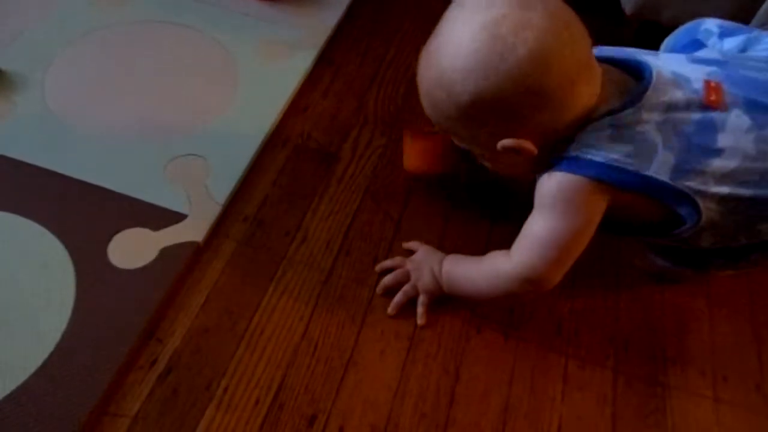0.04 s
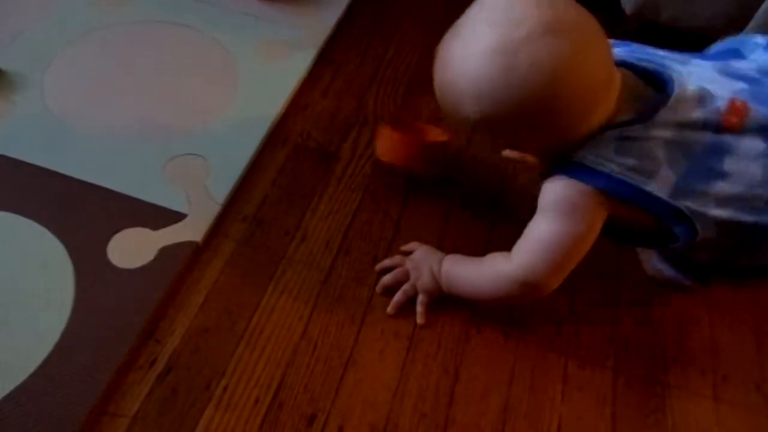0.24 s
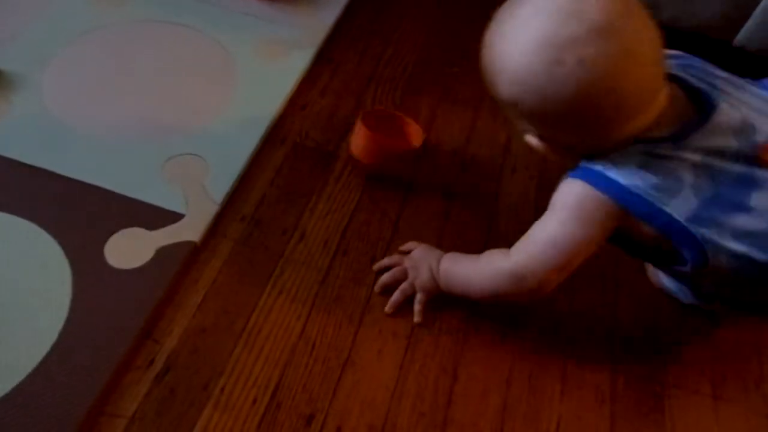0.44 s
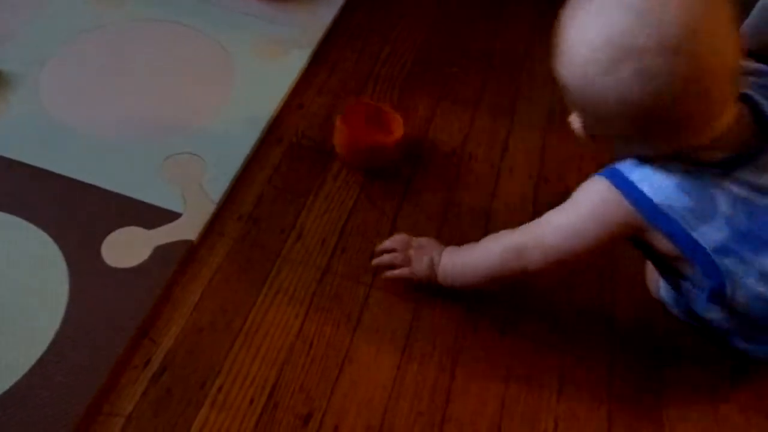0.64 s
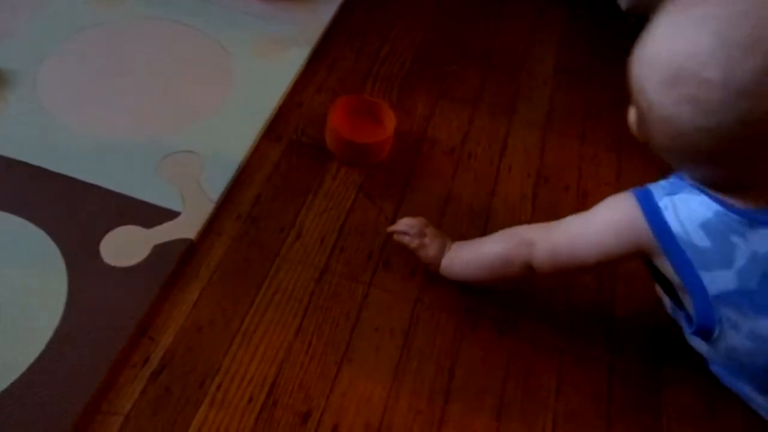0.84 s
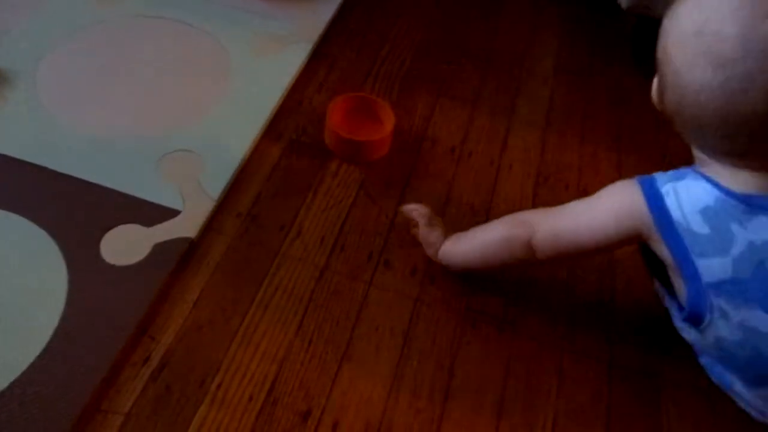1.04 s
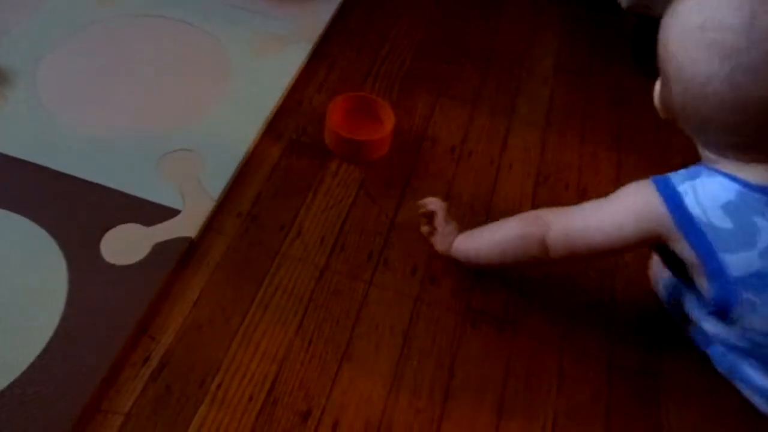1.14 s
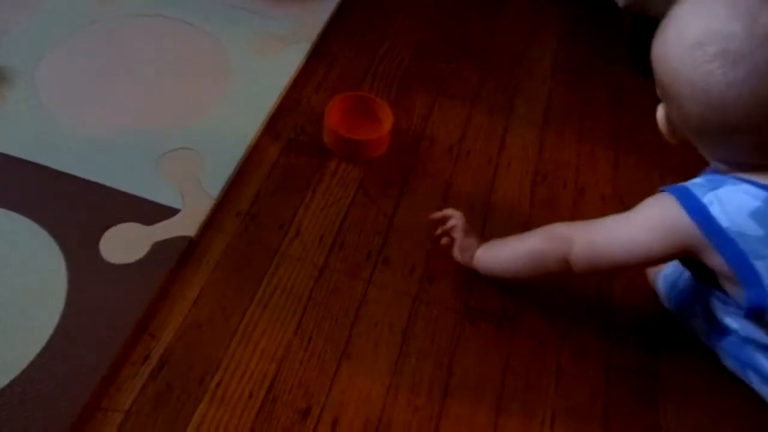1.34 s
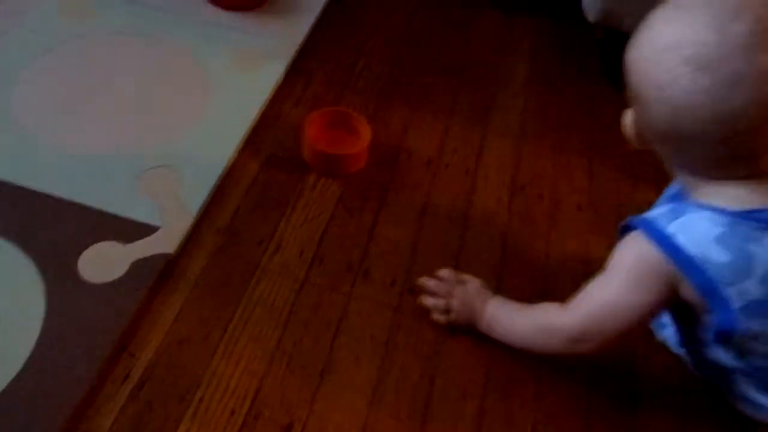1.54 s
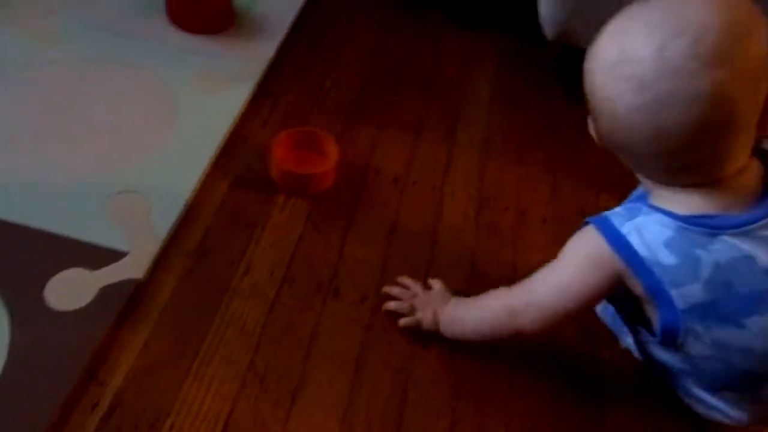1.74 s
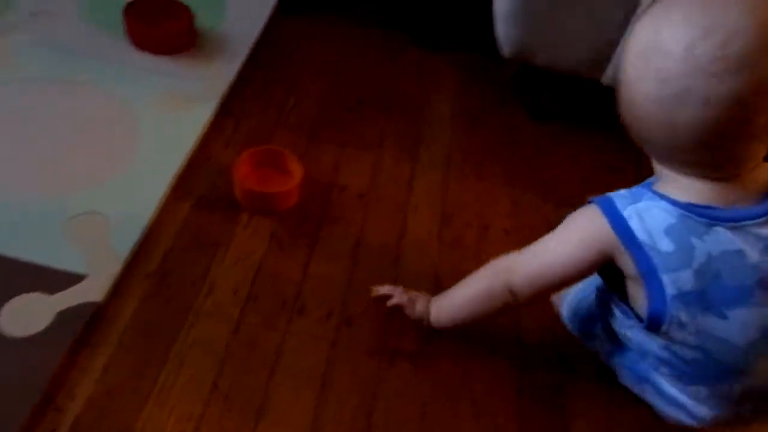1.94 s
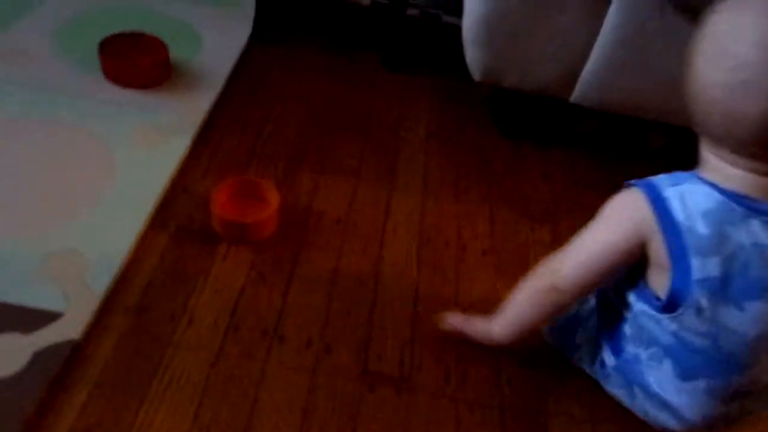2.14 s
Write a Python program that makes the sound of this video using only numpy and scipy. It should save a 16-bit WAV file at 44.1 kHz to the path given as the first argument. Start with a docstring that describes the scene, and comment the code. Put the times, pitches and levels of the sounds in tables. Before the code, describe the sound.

Quickening clacks of a plastic cup wobbling to rest on floorboards, then soft thumps.

```python
"""Fingers rub faintly on hard plastic; then the cup tips out of a baby's hand and rocks on a wooden
floor, ever faster, until it settles. Each touch of the rim cracks, rings the cup wall and knocks the
boards, and a small quiet room answers. A hand then thumps softly on the floor.
Two closely spaced microphones hear it from above, with the cup a little to the right."""
import sys
import numpy as np
from scipy import signal
from scipy.fft import rfft, irfft
from scipy.io import wavfile

SR = 44100
rng = np.random.default_rng(int(sys.argv[2]) if len(sys.argv) > 2 else 0)


def output_pcm(signal):
    """Save a mono or channel-first signal as 16-bit PCM at the path in sys.argv[1].

    Samples are clipped to [-1, 1] before scaling.
    """
    pcm = np.clip(np.atleast_2d(signal).T, -1, 1) * 32767
    wavfile.write(sys.argv[1], SR, np.round(pcm).astype(np.int16))


N = 97020
T = np.arange(N) / SR
CONTACT_T = T[:N // 12]
FREQS = np.arange(N + 1) * SR / (2 * N)

# The rim landing on the floor below the microphones: (time [s], gain [dB], knock gain [dB],
# knock centre [Hz], crack gain [dB], contact cut-off [Hz], ring centre [Hz])
RIM_CONTACTS = [ (.2260, -21, 12, 264, -22, 3000, 2000), (.2341, -6.5, 3.5, 179, 1.5, 4980, 2000),
                (.3980, -22.5, 2, 400, 3, 4200, 2400), (.4015, -27.5, 8, 400, 9, 9000, 2400),
                (.4050, -1, 0.5, 300, 1, 9000, 2190), (.5358, -24.5, 13, 400, 8, 5000, 2000),
                (.5399, -2, -2, 324, -4.5, 4420, 2240), (.6545, -2, -2, 380, -3, 6500, 2780),
                (.6575, -16.5, 1, 457, 7.5, 5500, 2400), (0.7494, -12.5, 2, 500, -6, 9700, 2800),
                (.7520, -16, 5.5, 586, 9.5, 18300, 2700), (.8330, -14, 4.5, 550, -0.5, 5000, 2800),
                (.8362, -26, 12.5, 550, 1, 11900, 1400), (.8404, -20.5, 8.5, 400, 4, 7000, 1800),
                (.8480, -9.5, -3, 447, 0.5, 6500, 3000), (.9047, -11.5, 2, 500, -2, 6300, 2900),
                (.9074, -32, 6, 450, -5, 11000, 1640), (.9195, -13, 1.5, 353, -5.5, 7760, 1680),
                (.9298, -33, -17, 400, 8, 5000, 2400), (.9634, -15.5, 6.5, 560, 1.5, 8450, 3000),
                (.9778, -15, 1, 330, 1.5, 6200, 3260), (.9968, -22, 9.5, 297, -2, 3460, 2400),
                (1.0063, -21.5, 10, 500, 2.5, 11000, 1200)]

def rocking_cup():
    """Each landing shakes cup and floor; gives the direct sound and (time, sound) pairs for the room."""
    direct, into_room = np.zeros(N), []
    for start, db, knock_db, knock_hz, crack_db, cutoff_hz, ring_hz in RIM_CONTACTS:
        softness = signal.butter(1, cutoff_hz, fs=SR)
        strike = lambda x: amp(db) * signal.lfilter(*softness, x)
        click, crack = map(strike, rim_crack(crack_db))
        wall = strike(wall_ring(start, ring_hz))
        boards = strike(board_knock(knock_db, knock_hz))
        plastic = wall + crack
        echo_lag_s = 0.0029 * (1 + 0.039 * rng.standard_normal())  # first strong reflection
        echo = np.interp(CONTACT_T - echo_lag_s, CONTACT_T, plastic, left=0)
        add(direct, start, plastic + amp(-10) * echo - boards)
        into_room += [(start, amp(3) * click), (start, amp(3) * wall - amp(-3.5) * boards)]
    return direct, into_room


# Spectrum of plastic meeting wood: (frequency [Hz], relative level [dB])
CRACK_SPECTRUM = [(100, -22), (400, -16), (1000, -0.5), (2000, 7.5), (3200, 3), (3900, -3), (5200, -4),
                  (6400, -13), (8000, -10.5), (10000, -13.5), (13000, -11.5), (16000, -5)]

def rim_crack(db, grain_decay_s=0.0015):
    """The hard rim clicks on the wood; gives the clean click and the same click made grainy."""
    click = amp(db + 10.5) * irfft(minimum_phase(curve(CRACK_SPECTRUM)))[:len(CONTACT_T)]
    grain = 0.17 * rng.standard_normal(len(click)) * np.exp(-CONTACT_T / grain_decay_s)
    grain[0] = 1
    return click, signal.fftconvolve(grain, click)[:len(click)]


# Modes of the cup wall: (frequency [Hz], relative level [dB], t60 [s])
WALL_MODES = [(1080, -25, .04), (1220, -21, 0.022), (1698, -8.5, 0.15), (1853, -6, 0.1),
              (2104, -2.5, 0.034), (2270, -0.5, 0.029), (2524, -4.5, 0.03), (2700, -5.5, .04),
              (2904, 3.5, 0.027), (3122, -7, 0.088), (3280, -14, 0.11), (4688, 6, 0.019),
              (5070, -24, 0.015), (7640, -17, .015)]
# Low wall modes, freer as the cup comes upright: (nominal frequency [Hz], relative level [dB], t60 [s])
FREED_MODES = [(1317, -5, 0.094), (1397, -6, 0.099)]

def wall_ring(start, centre_hz, upright_s=0.85, rise_db_per_s=36):
    """The struck wall rings, its pitches shifted a little by each contact."""
    shift = 1 + 0.016 * rng.standard_normal((len(WALL_MODES), 1))
    wall = ring(WALL_MODES, CONTACT_T, centre_hz, focus_db_per_oct=13.5, tuning=shift)
    freed = ring(FREED_MODES, CONTACT_T, centre_hz, focus_db_per_oct=0, tuning=0.98)
    freedom = amp(-rise_db_per_s * max(upright_s - start, 0))
    return amp(-16.5) * (wall + freedom * freed)


# Floorboards under the cup: (frequency [Hz], relative level [dB], t60 [s])
FLOOR_MODES = [(167.7, -49, 0.061), (234.4, 0.5, 0.075), (251, -6.5, 0.058), (343, -8, 0.098),
               (380, -7, 0.054), (498, -7, 0.073), (563, 8.5, 0.027), (717.3, 1, 0.085), (885, -4, 0.07)]

def board_knock(db, centre_hz, lag_s=0.002258, cut_hz=166):
    """The boards answer just after the rim; pitches differ from spot to spot and little bass radiates."""
    spot = 1 + 0.015 * rng.standard_normal((len(FLOOR_MODES), 1))
    t = np.maximum(CONTACT_T - lag_s, 0)
    knock = ring(FLOOR_MODES, t, centre_hz, focus_db_per_oct=6.5, tuning=spot)
    low_cut = signal.butter(3, cut_hz, "high", fs=SR, output="sos")
    return amp(db - 20.5) * signal.sosfilt(low_cut, knock)


# The rim scraping along the floor: (end time [s], peak level [dB])
RIM_DRAGS = [(.234, -27), (0.407, -14), (.540, -24.5), (0.6565, -20), (0.751, -23)]

def rim_drags(rise_s=0.0046):
    """The rim drags on the wood, swelling into each of the first landings."""
    scrape = noise(band(920, width_hz=1850) ** 2)
    return scrape * sum(amp(db) * (T < end) * np.exp(-abs(T - end) / rise_s) for end, db in RIM_DRAGS)


# Hand and body on the floor, centred between the microphones:
# (time [s], peak level [dB], frequency [Hz], half rise time [s])
FLOOR_THUMPS = [(1.112, -39.5, 75, 0.0058), (1.171, -22, 149, 0.0048), (1.201, -30, 52.4, 0.0059),
                (1.204, -36, 150, 0.0036), (1.243, -40.5, 159, 0.0064), (1.287, -33.5, 53.3, 0.0038),
                (1.362, -61, 60, 0.0072), (1.426, -53, 60, 0.0086), (1.508, -59, 57, 0.0065)]

def hand_thumps():
    """Soft weight on the boards: a few low cycles that swell and die."""
    out = np.zeros(N)
    for start, db, hz, half_rise_s in FLOOR_THUMPS:
        rise = T / (2 * half_rise_s)
        envelope = rise * np.exp((1 - rise ** 2) / 2)
        add(out, start, amp(db) * envelope * np.sin(2 * np.pi * hz * T))
    return out


# Resonances of the rubbed wall: (frequency [Hz], width [Hz], relative level [dB])
RUB_RESONANCES = [(3000, 470, 5), (4400, 460, 7), (7400, 4100, -9.5)]
# Fingers on the cup before it tips: (peak time [s], half-width [s], level [dB])
FINGER_RUBS = [(0.045, 0.0085, -55.5), (0.068, 0.0063, -52), (.081, 0.0039, -46.5), (0.1, 0.02, -59.5)]

def finger_rubs():
    """Sliding fingers stir the resonances of the plastic."""
    friction = noise(sum(amp(db) * band(hz, width) for hz, width, db in RUB_RESONANCES))
    return friction * sum(amp(db) * swell(time, width) for time, width, db in FINGER_RUBS)


# Ticks and rustles near the cup: (peak time [s], half-width [s], level [dB], centre [Hz])
CLOTH_SCUFFS = [(0.09, 0.026, -45.5, 417), (0.1795, .0008, -48.5, 9000), (1.789, 0.0073, -56, 1660),
                (2.091, 0.0027, -60, 8100), (2.175, 0.019, -54, 710)]

def cloth_scuffs():
    """Hand and cloth brush the floor in brief swells of noise."""
    return sum(noise(band(hz, 1.6 * hz) ** 2, db) * swell(time, width)
               for time, width, db, hz in CLOTH_SCUFFS)


# Reverberation of the small room: (frequency [Hz], relative level [dB], t60 [s])
ROOM_BANDS = [(150, 4, 0.4), (400, 8, 0.23), (1080, 2, 0.54), (2310, -2, 0.36), (5000, 1.5, 0.4),
              (9000, -0.5, 0.43), (14000, 8, 0.15)]

def room(hits, bounces_per_s=900, early_db=-18.5, early_decay_s=0.023, tail_db=-38.5, build_s=0.0027):
    """Scattered reflections from nearby, then a tail that dies soonest in the top treble."""
    t, out = T[:N // 5], np.zeros((2, N))
    spectrum = rfft(rng.standard_normal((2, N)), 2 * N)
    tails = [irfft(spectrum * curve([(row[0], row is chosen) for row in ROOM_BANDS]))
             for chosen in ROOM_BANDS]
    bounces = (rng.random((2, N)) < bounces_per_s / SR) * rng.choice([-1, 1], (2, N))
    absorption = 1 + 1j * FREQS / 7600  # cloth and skin near the cup soak up the treble
    bounces = filt(bounces, minimum_phase(curve(ROOM_BANDS)) / absorption)
    age = np.maximum(t - 0.0011, 0)  # time since the reflections began
    build = 1 - np.exp(-age / build_s)
    fades = [amp(db + tail_db) * np.exp(-np.log(1000) * t / t60) * build for _, db, t60 in ROOM_BANDS]
    early = amp(early_db) * (age > 0) * np.exp(-age / early_decay_s)
    for k, (start, hit) in enumerate(hits):
        offset = k * len(t) // 12  # the paths change as the cup moves
        part = slice(offset, offset + len(t))
        response = early * bounces[:, part] + sum(fade * tail[:, part] for fade, tail in zip(fades, tails))
        for channel, paths in zip(out, response):
            add(channel, start, signal.fftconvolve(hit, paths))
    return diffuse(*out)


# Room tone all around the microphones: (frequency [Hz], relative level per hertz [dB])
ROOM_TONE = [(12, -15), (20, -2), (60, 0.5), (85, -10), (129, -19), (144, -13), (236, -9.5), (270, -12.5),
             (319, -8.5), (386, -13), (567, -15), (787, -18), (2490, -28.5), (4680, -38.5), (14000, -41)]

def room_tone():
    """Low rumble, faint hiss and a hum that wavers."""
    air = filt(diffuse(*rng.standard_normal((2, N))), amp(curve(ROOM_TONE)))
    hum = noise(band(319, width_hz=23.4) ** 2, db=-56)
    return level(air, db=-46) + hum


def amp(db):
    """Decibels to gain."""
    return 10 ** (np.asarray(db) / 20)


def level(x, db):
    """Scale to an rms level."""
    return x * amp(db) / np.sqrt(np.mean(x ** 2))


def curve(points):
    """A table's second column over log frequency."""
    table = np.array(points, float)
    return np.interp(np.log(FREQS + 1), np.log(table[:, 0]), table[:, 1])


def filt(x, gain):
    """Apply a frequency response."""
    return irfft(rfft(x, 2 * N) * gain)[..., :N]


def minimum_phase(db):
    """Causal response of a dB curve."""
    cepstrum = irfft(db * np.log(10) / 20)
    return np.exp(rfft(np.r_[cepstrum[0], 2 * cepstrum[1:N]], 2 * N))


def band(hz, width_hz):
    """Response of one resonance."""
    s = 1j * FREQS
    return s * width_hz / (s * s + s * width_hz + hz * hz)


def noise(response, db=0):
    """Coloured noise at an rms level."""
    return level(filt(rng.standard_normal(N), response), db)


def swell(peak_s, half_width_s):
    """Bell-shaped envelope."""
    return np.exp(-0.5 * ((T - peak_s) / half_width_s) ** 2)


def ring(modes, t, centre_hz, focus_db_per_oct, tuning):
    """Decaying modes; the focus favours those near the centre."""
    hz, db, t60 = np.array(modes, float).T[:, :, None]
    gain = amp(db - focus_db_per_oct * abs(np.log2(hz / centre_hz)))
    return np.sum(gain * np.sin(2 * np.pi * hz * tuning * t) * np.exp(-np.log(1000) * t / t60), axis=0)


def add(out, start_s, x):
    """Mix a sound in at a time."""
    i = int(start_s * SR)
    out[i:i + len(x)] += x[:N - i]


def diffuse(mid, side, apart_hz=11000):
    """Diffuse sound at two close microphones: alike in the bass, unrelated in the treble."""
    apart = np.clip(FREQS / apart_hz + 0.096, 0, 1)
    common = filt(mid, 1 / np.hypot(1, apart))
    opposed = filt(side, apart / np.hypot(1, apart))
    return np.array([common + opposed, common - opposed])


# The cup as the overhead pair hears it: (frequency [Hz], left minus right level [dB])
PAIR_BALANCE = [(200, -0.5), (700, 1), (1300, -1.5), (2400, -2.3), (4400, -2.7), (8000, -7), (14000, 1)]

def scene(mic_lag_s=5e-6):
    """From above: the cup a little to the right, its room, the thumps and the room tone."""
    direct, into_room = rocking_cup()
    near = direct + finger_rubs() + cloth_scuffs() + rim_drags()
    left = amp(curve(PAIR_BALANCE) / 2) * np.exp(1j * np.pi * FREQS * mic_lag_s)
    return filt(near, np.array([left, 1 / left])) + room(into_room) + hand_thumps() + room_tone()


def record(dry, roll_hz=13900, top_hz=16400):
    """The recorder rolls off the treble, clips at full scale and cuts the very top."""
    roll_off = signal.butter(12, roll_hz, fs=SR, output="sos")
    top_cut = signal.ellip(8, 0.2, 80, top_hz, fs=SR, output="sos")
    clipped = np.clip(signal.sosfilt(roll_off, dry), -1, 1)
    return signal.sosfilt(top_cut, clipped)


dry = scene()
out = record(dry)
output_pcm(out)
```